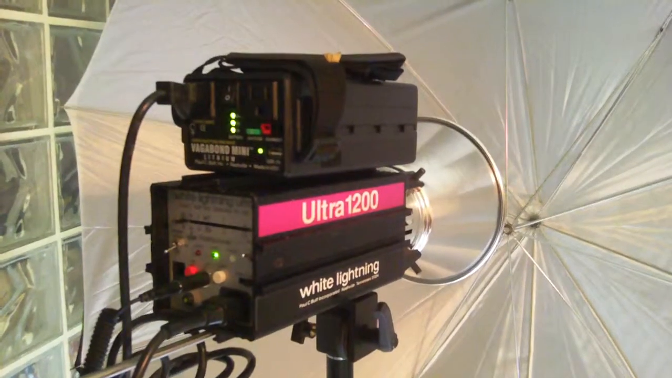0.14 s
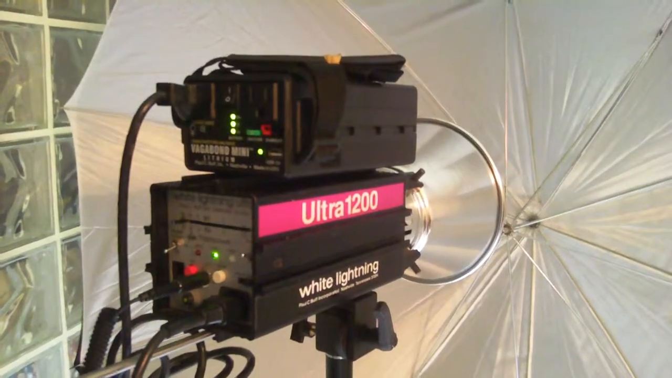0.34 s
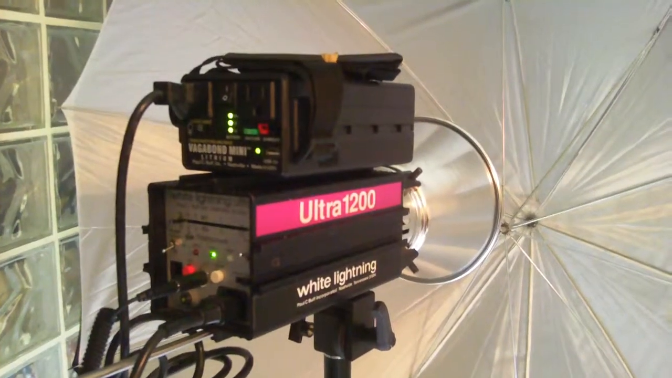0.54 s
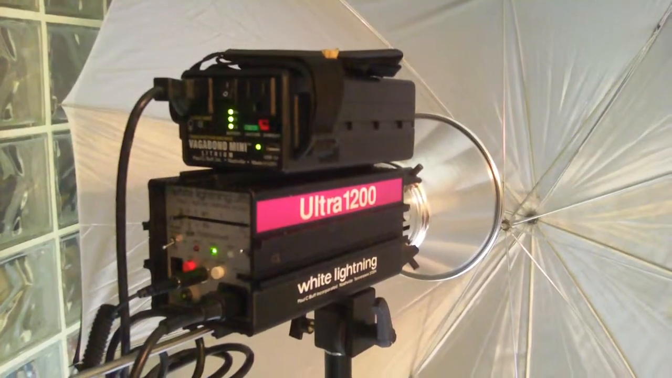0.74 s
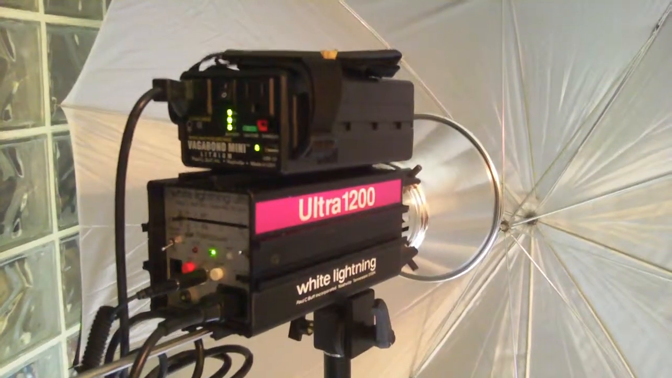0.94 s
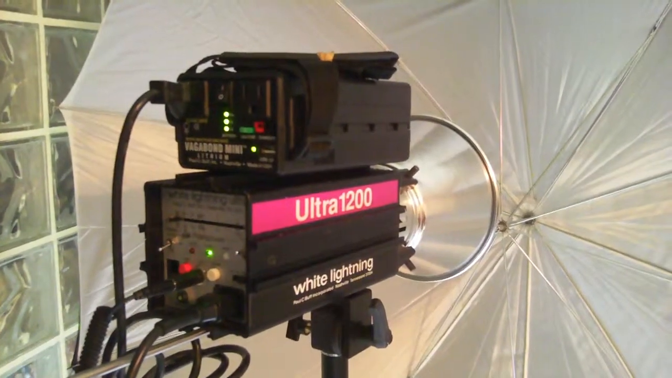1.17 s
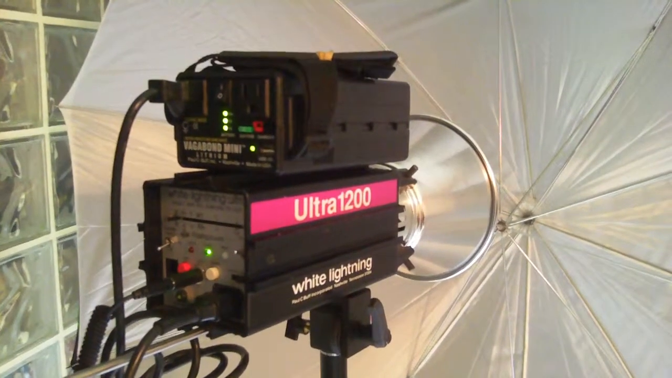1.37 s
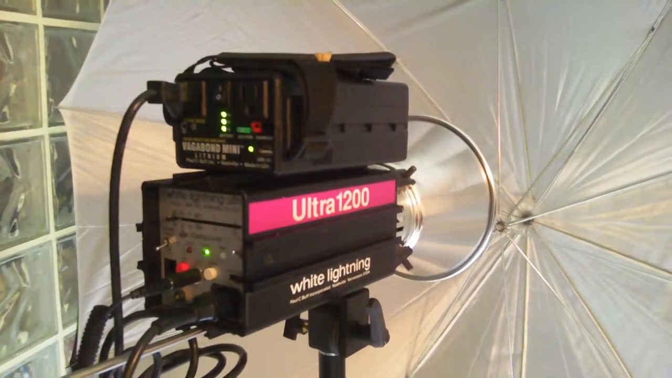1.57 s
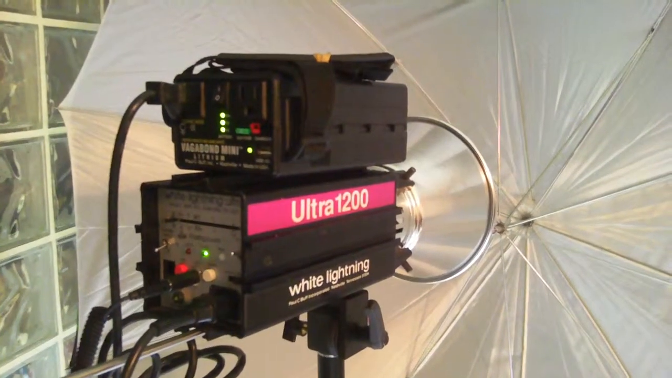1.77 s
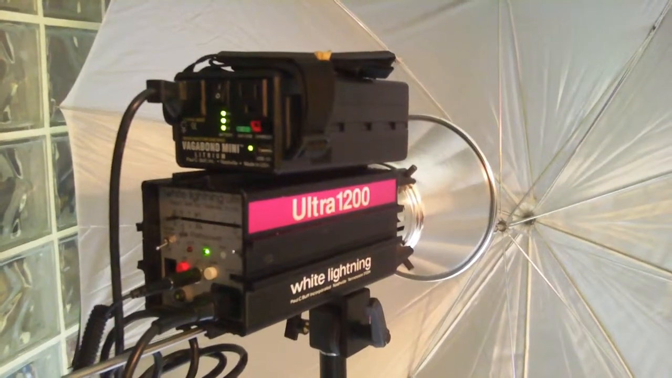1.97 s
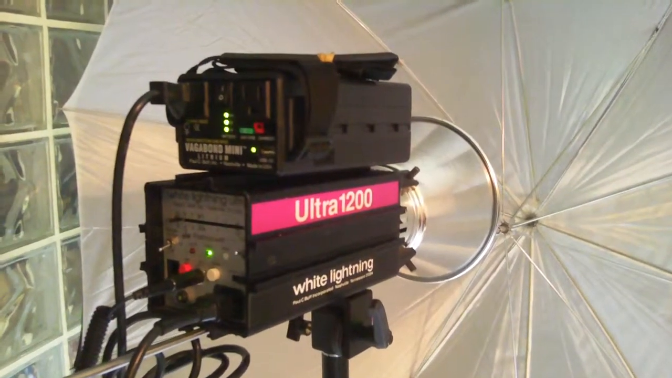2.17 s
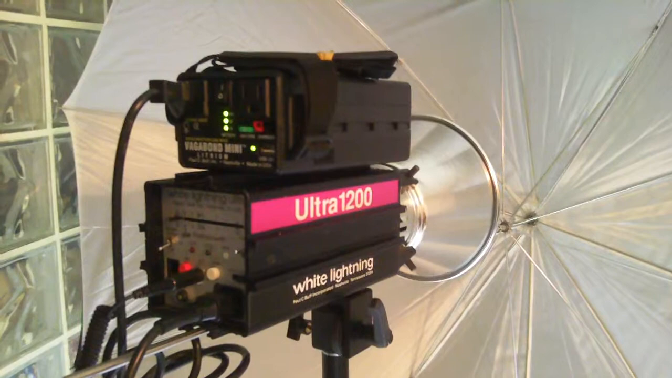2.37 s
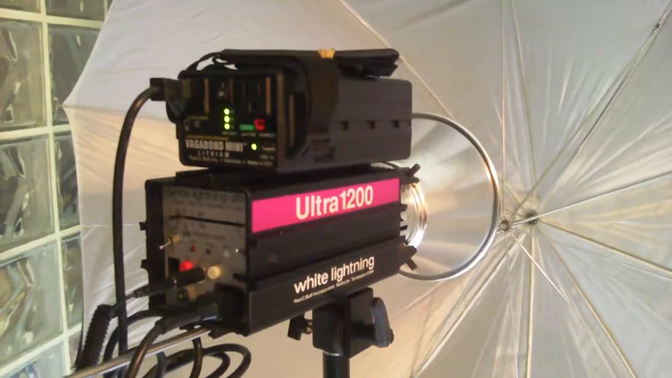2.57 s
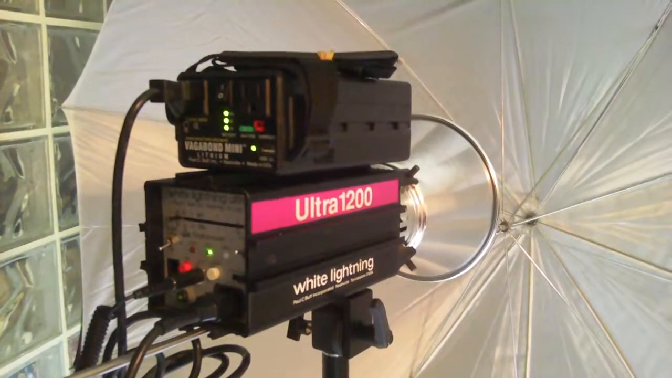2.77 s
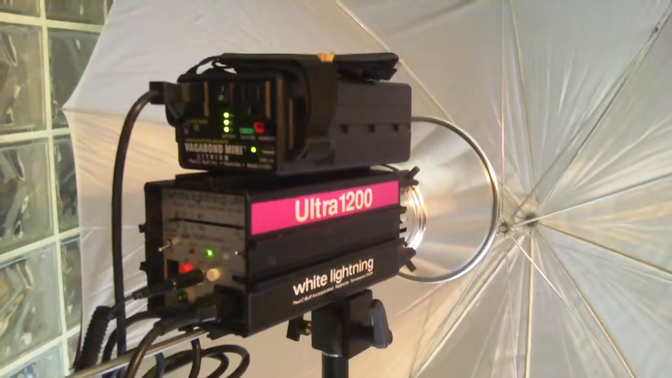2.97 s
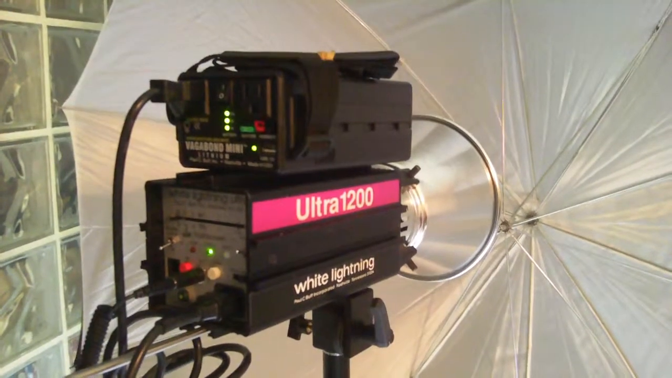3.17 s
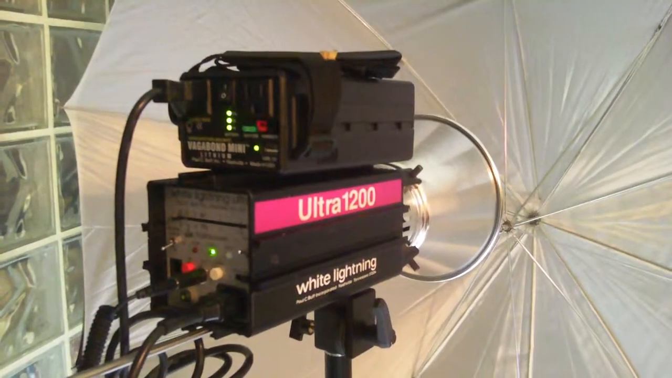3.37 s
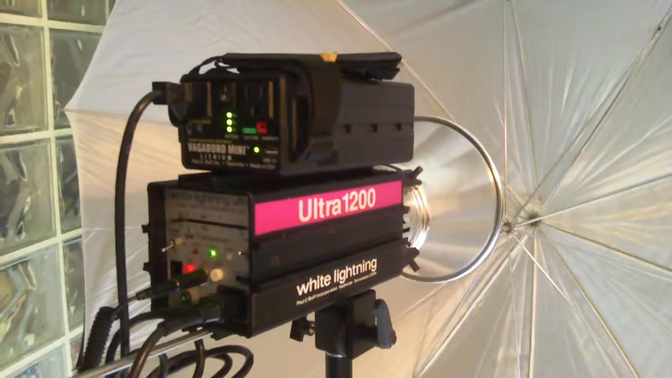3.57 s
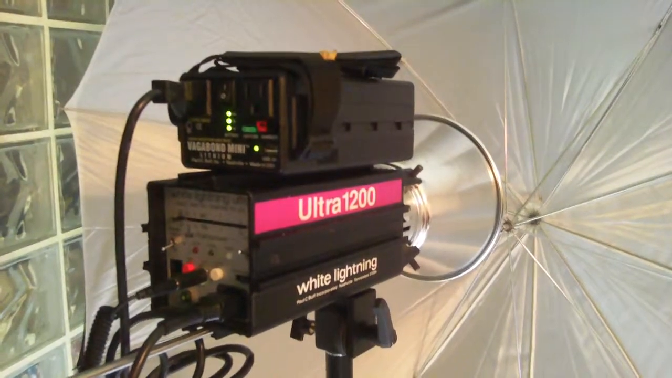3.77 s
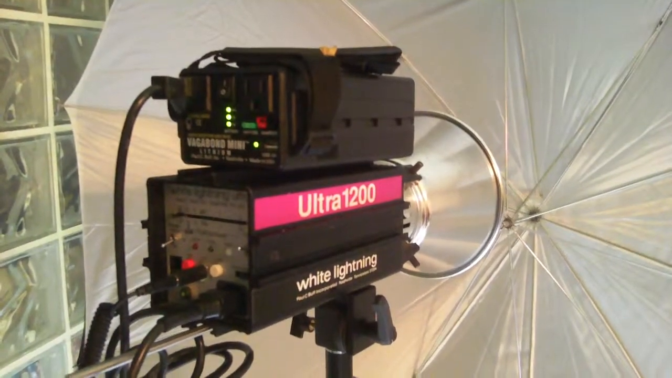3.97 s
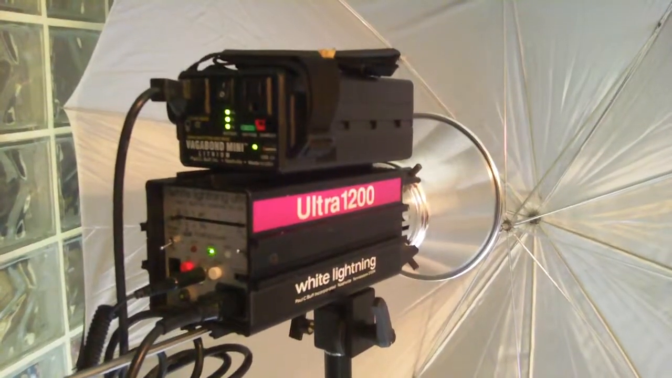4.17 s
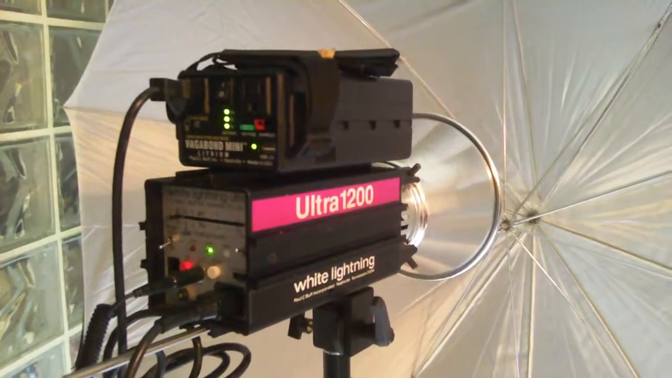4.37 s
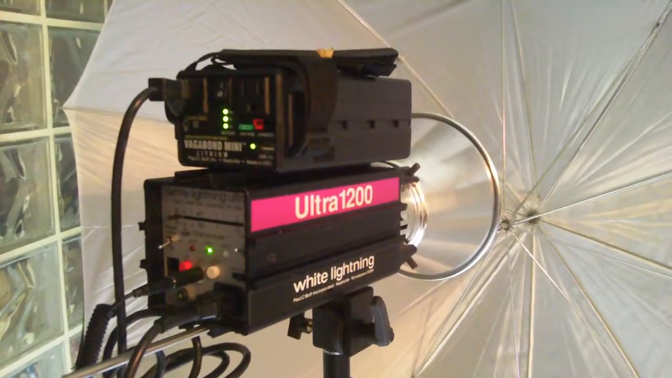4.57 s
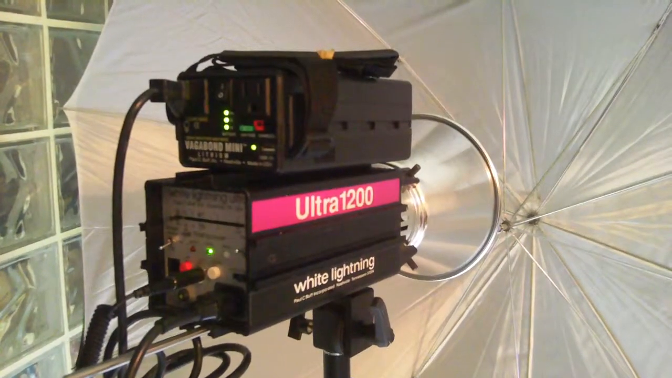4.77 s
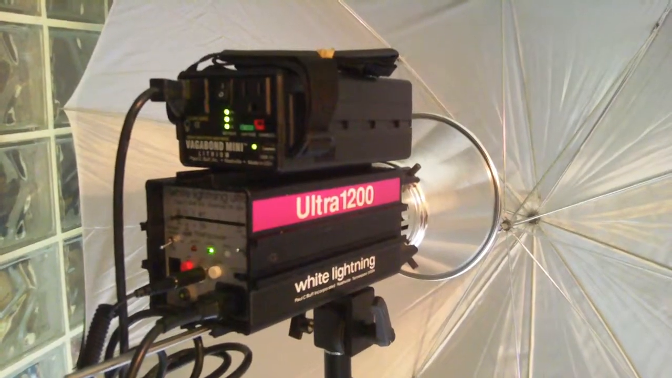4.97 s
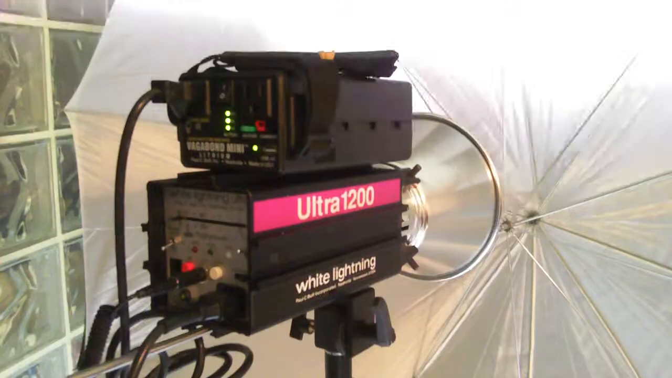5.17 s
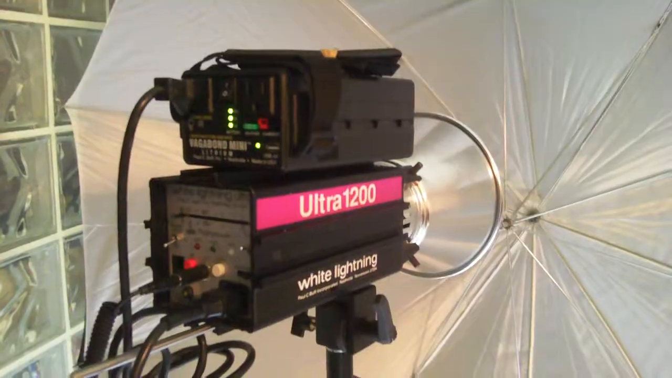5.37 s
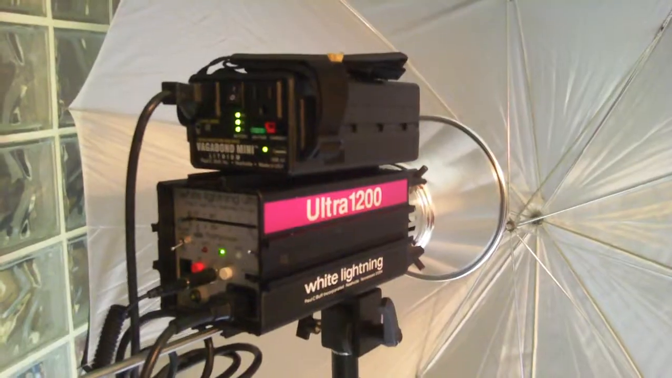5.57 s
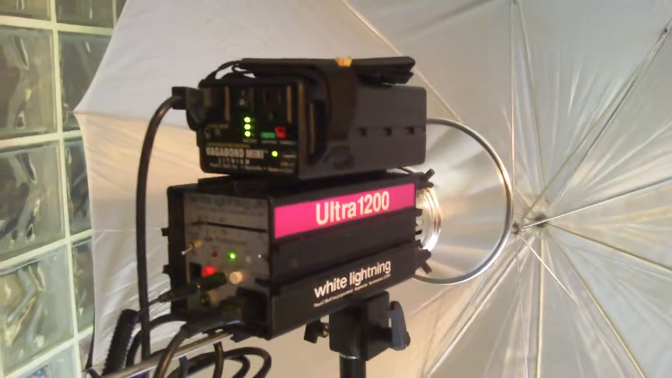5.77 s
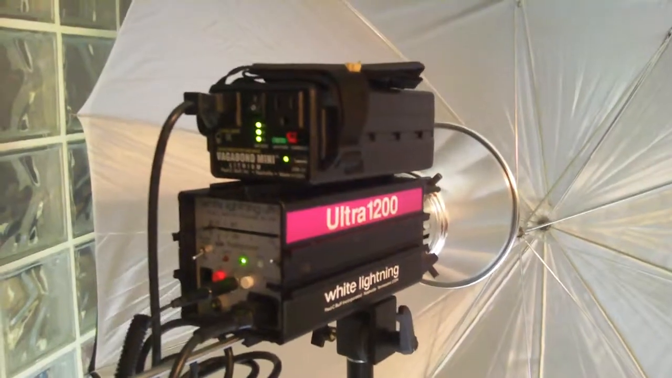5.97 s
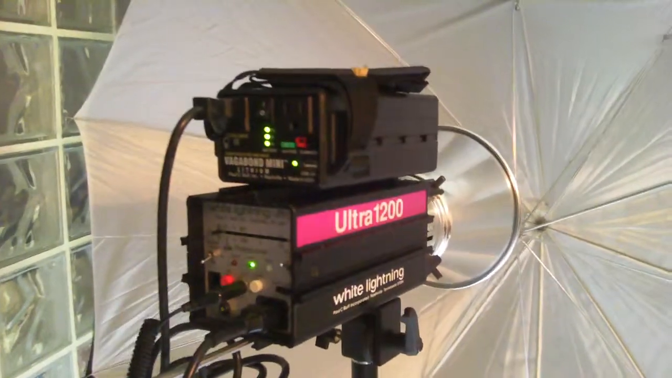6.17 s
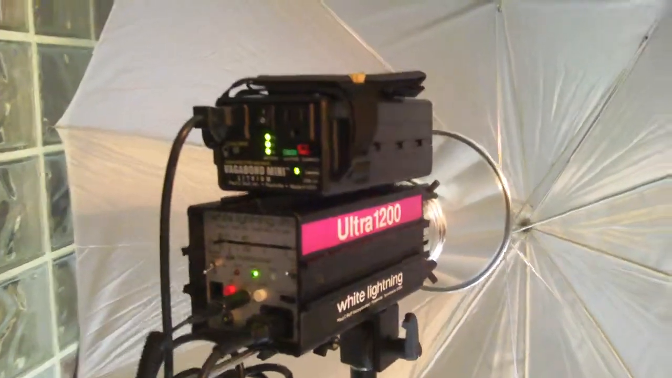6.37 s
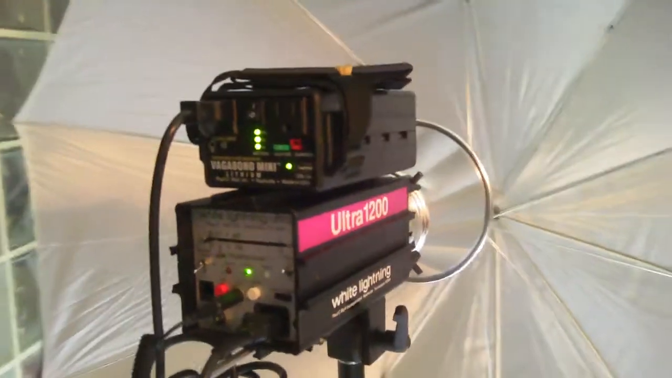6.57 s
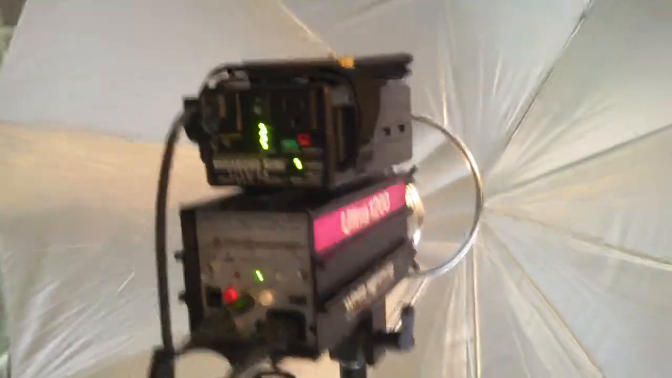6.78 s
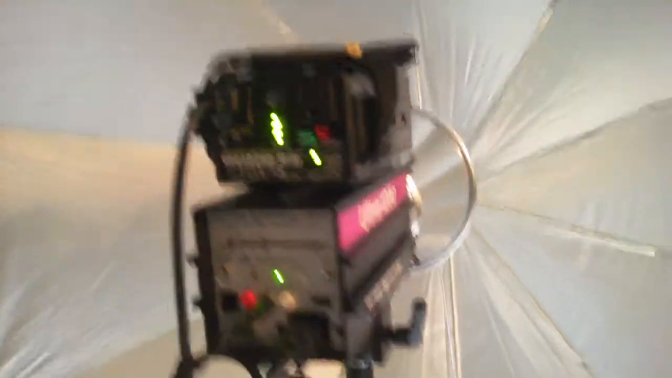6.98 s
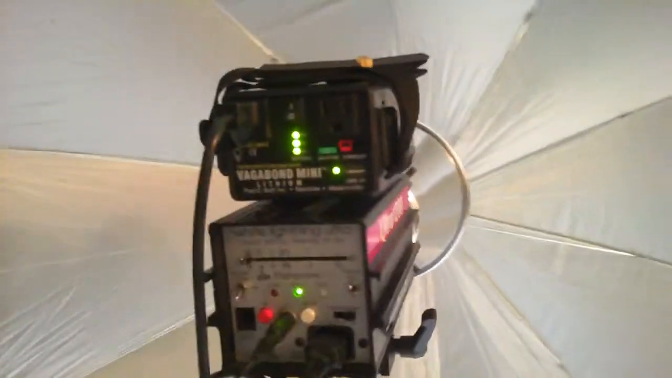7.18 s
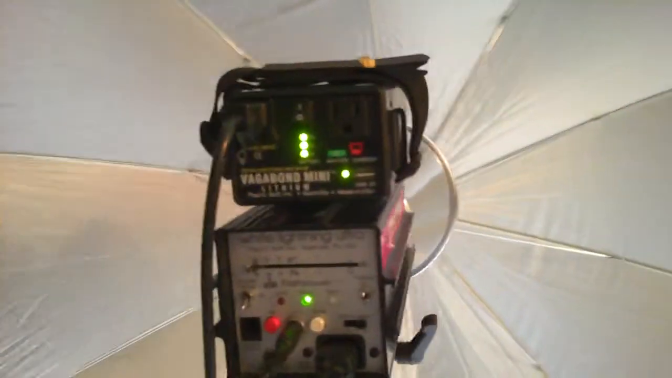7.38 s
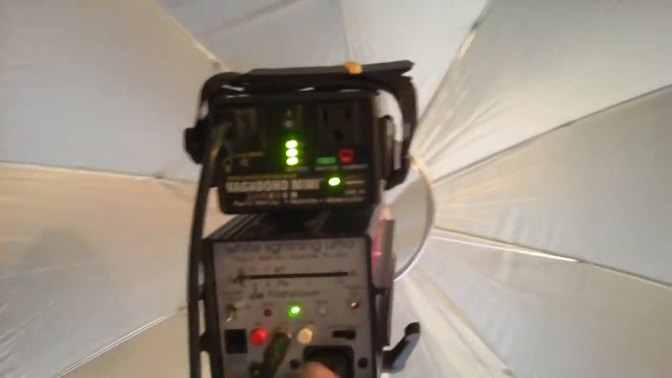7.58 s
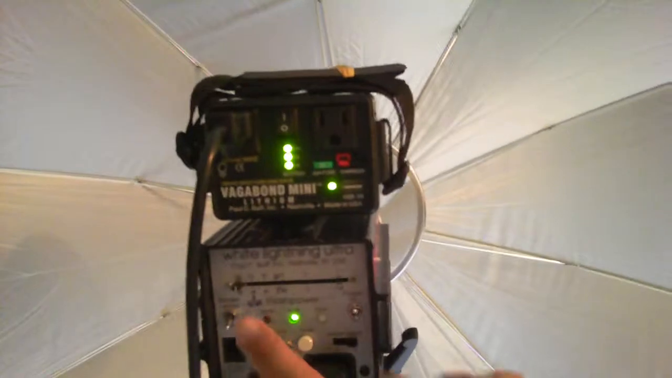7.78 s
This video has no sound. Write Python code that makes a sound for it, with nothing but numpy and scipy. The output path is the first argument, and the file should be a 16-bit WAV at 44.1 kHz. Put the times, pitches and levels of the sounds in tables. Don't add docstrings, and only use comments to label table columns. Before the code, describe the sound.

Three sharp, bright studio flash cracks ring briefly over quiet ventilation hum and hiss, then a button knock and rumbling, rustling handling as the camera moves.

```python
import sys
import numpy as np
from scipy import signal
from scipy.fft import rfft, irfft, next_fast_len
from scipy.io import wavfile
from scipy.ndimage import uniform_filter1d

SR = 44100
rng = np.random.default_rng(int(sys.argv[2]) if len(sys.argv) > 2 else 0)


def field_ratio(decibels):
    return 10 ** (np.asarray(decibels, dtype=float) / 20)


def bounce(signal):
    frames = np.transpose(np.atleast_2d(signal))
    limited = np.clip(frames, -1, 1)
    pcm = np.round(limited * 32767).astype(np.int16)
    wavfile.write(sys.argv[1], SR, pcm)


N = 344923

# (frequency [Hz], level [dB per Hz])
VENTILATION = [(20, -50), (40, -9), (120, -15.5), (200, -3), (500, -5), (1100, -9.5), (1400, -12.5),
               (7000, -25)]
# (frequency [Hz], width [Hz], level [dB])
HUM = [(60.6, 2.7, -88.5), (102.2, 6, -79.5), (118.8, 1.5, -74.5), (204, 6.4, -83), (237.3, 4.9, -79.5),
       (410, 4.5, -78), (465, 3, -77)]
VENTILATION_DB, HISS_DB = -59.5, -60.5

# (time [s], effort [dB])
EFFORT = [
    (6.85, -9),
    (6.99, -2),
    (7.09, -4),
    (7.22, -2),
    (7.36, -1.5),
    (7.55, -2),
    (7.65, 3),
    (7.72, -1.5),
    (7.82, -4),
]
# (start [s], length [s], frequency [Hz], width [Hz], level [dB])
SWISHES = [
    (6.96, .1, 10800, 1500, -67),
    (7.142, 0.14, 11100, 700, -66),
    (7.3, .14, 11000, 600, -68),
    (7.6, 0.13, 10100, 600, -68),
    (7.64, 0.19, 8500, 500, -66),
]
RUMBLE_DB, RUSTLE_DB = -60.5, -64
THRUM_S, THRUM_LENGTH_S, THRUM_DB = 7.02, 0.83, -66

# (time [s], frequency [Hz], peak level [dB])
TICKS = [
    (3.872, 1900, -50),
    (5.4168, 2470, -45.5),
    (5.423, 2600, -50),
    (5.4265, 2500, -52),
    (5.4355, 2450, -52),
    (6.8705, 972, -45.5),
    (6.977, 600, -50),
]
TICK_RISE_S, TICK_T60_S = 0.00012, 0.007
TICK_OVERTONE, TICK_OVERTONE_DB = 2.18, -8
# (frequency [Hz], peak level [dB], 60 dB decay [s])
KNOCK = [(950, -46, .005), (1370, -37, 0.0046), (2080, -39, .004), (3100, -46, .004), (5500, -45.5, .004),
         (7000, -55, .012), (8500, -49, .004), (10500, -42, .002), (12500, -48, .0044)]
KNOCK_S, KNOCK_RISE_S = 6.8002, 0.00016
KNOCK_HITS = [(0, 0), (1.38, -12)]
# (frequency [Hz], width [Hz], level [dB])
SCUFF_TONE = [(6500, 1100, 9), (8600, 1300, 3), (5000, 1200, -7), (10200, 1500, -5)]
# (time [s], level [dB])
SLIPS = [
    (4.5965, -51.5),
    (4.607, -54.5),
    (4.617, -57),
    (4.627, -65),
    (4.642, -64),
    (4.667, -66),
]
SLIP_RISE_S, SLIP_T60_S, SLIP_GRAIN_DB = 0.00097, 0.064, 1

# (time [s], level [dB])
FLASHES = [
    (2.39684, 0),
    (3.75345, -.5),
    (5.24623, .7),
]
# (delay [ms], level [dB], tilt [dB per kHz])
PATHS = [
    (.08, -12, -1),
    (.95, -12, -3.5),
    (2.62, 0, 0),
    (4.42, -5, -3.5),
    (5.5, -16, 0),
    (6.7, -17, 2),
]
TILT_CENTRE_HZ = 11500
# (frequency [Hz], peak level [dB], rise [ms], 60 dB decay [s])
CRACK = [(9750, -22, .9, .0028), (10300, -23, .3, .007), (10870, -13.5, .22, .0025), (11600, -21, .1, .007),
         (13270, -11, 1.3, .003), (14480, -25, .1, .009)]
# (frequency [Hz], peak level [dB], 60 dB decay [s])
BODY = [(980, -50.5, 0.039), (1536, -59, 0.045), (2110, -45, .022), (2990, -40.5, 0.0058),
        (3770, -51, 0.0091), (4290, -41.5, .014), (5160, -52, 0.0064), (5970, -36.5, 0.005),
        (6290, -40, .02), (6900, -37, .007), (7310, -37, .02)]
BODY_RISE_S, BODY_DIRECT_DB = 0.00023, -11
# (frequency [Hz], level [dB], 60 dB decay [s])
RINGS = [(6721, -40.4, 0.068), (7190, -40.7, 0.03), (7413, -55.5, 0.35), (8479, -44.9, 0.06),
         (9212, -34.6, 0.06), (9268, -26.7, 0.063), (10131, -35.9, 0.03), (10275, -39.1, 0.041),
         (10346, -48.6, 0.263), (10409, -32.6, 0.03),
         (10923, -48.7, 0.146), (11172, -45.0, 0.12), (11328, -38.4, 0.033), (11618, -35.9, 0.043),
              (12092, -44.1, 0.078), (12404, -41.1, 0.048), (12875, -40.7, 0.09), (13364, -40.0, 0.158),
              (13385, -30, 0.045), (13540, -36.0, 0.03), (14779, -49.6, 0.069)]
RING_DELAY_S, RING_RISE_S, RING_LONGEST_S = 0.00461, 0.0013, 0.12
# (frequency [Hz], level [dB per Hz])
SNAP_COLOUR = [(500, -30), (900, -25), (2500, -8.5), (3500, -16), (5000, -10.5), (7400, -4), (8500, -30)]
# (start [ms], level [dB], rise [ms], 60 dB decay [s])
SNAPS = [
    (0, -42, .2, .02),
    (2.4, -44, 0.11, 0.043),
]
# (frequency [Hz], level [dB per Hz])
ROOM_COLOUR = [(710, -19), (1200, -15), (2120, -13.5), (4970, -13.5), (8050, -2.5), (13500, 3),
               (15700, -10), (16400, -52)]
# (start [ms], level [dB], rise [ms], 60 dB decay [s])
TAILS = [
    (4, -41.5, 2.7, 0.061),
    (9, -48.5, 7.9, 0.31),
]
# (frequency [Hz], width [Hz], level [dB])
WALL_TONES = [(9265, 90, -9), (13100, 50, -6), (10200, 60, -8.5), (6800, 200, -14), (11900, 80, -17),
              (12900, 80, -19), (2110, 90, -17), (4360, 370, -19), (5640, 160, -23), (3170, 80, -29),
              (1110, 290, -19)]
REPEAT = 0.59

NOTCH_HZ, NOTCH_WIDTH_HZ = 7810, 270
LOW_CUT_HZ, TOP_HZ, STOP_DB = 36, 15345, -38


def unit(x):
    return x / np.sqrt(np.mean(x ** 2))


def coloured(spectrum, size=N):
    hz, db = np.transpose(spectrum)
    bins = np.maximum(np.arange(size // 2 + 1) * SR / size, 1)
    gain = field_ratio(np.interp(np.log(bins), np.log(hz), db))
    return unit(irfft(rfft(rng.standard_normal(size)) * gain, size))


def band(hz, width, size=N):
    b, a = signal.iirpeak(hz, hz / width, fs=SR)
    return unit(signal.lfilter(b, a, rng.standard_normal(size)))


def bands(rows, size=N):
    return sum(field_ratio(db) * band(hz, width, size) for hz, width, db in rows)


def walk(rate):
    hold = int(SR / rate)
    steps = np.repeat(rng.standard_normal(N // hold + 1), hold)
    return unit(uniform_filter1d(steps, hold)[:N])


def arch(start, length):
    return np.sin(np.pi * np.clip((np.arange(N) / SR - start) / length, 0, 1))


def swell(t, rise, t60):
    t = np.maximum(t, 0)
    shape = (1 - np.exp(-t / rise)) ** 2 * 1000. ** (-t / t60)
    return shape / shape.max()


def swells(t, rows):
    return sum(field_ratio(db) * swell(t - ms / 1000, rise / 1000, t60) for ms, db, rise, t60 in rows)


def ring(t, hz, db, rise, t60):
    return field_ratio(db) * swell(t, rise, t60) * np.sin(2 * np.pi * hz * t)


def knocked(t, modes, db, rise):
    return sum((-1) ** k * ring(t, hz, mode_db + db, rise, t60) for k, (hz, mode_db, t60) in enumerate(modes))


def studio():
    ventilation = field_ratio(VENTILATION_DB) * coloured(VENTILATION)
    hiss = field_ratio(HISS_DB) * rng.standard_normal(N)
    return ventilation + hiss + bands(HUM)


def walking():
    times, efforts = np.transpose(EFFORT)
    effort = np.interp(np.arange(N) / SR, times, efforts, left=-120)
    grip = unit(band(460, 380) + field_ratio(-14) * band(1100, 900))
    rumble = grip * field_ratio(RUMBLE_DB + 1.5 * walk(25))
    rustle = band(9200, 6400) * field_ratio(RUSTLE_DB + 1.3 * walk(30))
    whistles = sum(field_ratio(db) * arch(start, length) * band(hz, width)
                   for start, length, hz, width, db in SWISHES)
    thrum = band(101.4, 2.5) * field_ratio(THRUM_DB) * arch(THRUM_S, THRUM_LENGTH_S)
    return (rumble + rustle) * field_ratio(effort) + whistles + thrum


def finger_ticks():
    out, t = np.zeros(N), np.arange(SR // 20) / SR
    for start, hz, db in TICKS:
        at = int(start * SR)
        tick = ring(t, hz, db, TICK_RISE_S, TICK_T60_S)
        tick += ring(t, TICK_OVERTONE * hz, db + TICK_OVERTONE_DB, TICK_RISE_S, TICK_T60_S)
        out[at:at + len(t)] += tick
    return out


def button_knock():
    out, t = np.zeros(N), np.arange(SR // 20) / SR
    at = int(KNOCK_S * SR)
    out[at:at + len(t)] = sum(knocked(t - ms / 1000, KNOCK, db, KNOCK_RISE_S) for ms, db in KNOCK_HITS)
    return out


def fabric_scuff():
    t = np.arange(N) / SR
    slips = sum(field_ratio(db) * swell(t - start, SLIP_RISE_S, SLIP_T60_S) for start, db in SLIPS)
    return unit(bands(SCUFF_TONE)) * slips * field_ratio(SLIP_GRAIN_DB * walk(700))


def tube_crack(t):
    out = np.zeros(len(t))
    for ms, path_db, tilt_db in PATHS:
        for hz, db, rise, t60 in CRACK:
            tilt = tilt_db * (hz - TILT_CENTRE_HZ) / 1000
            level = db + path_db + tilt + 0.5 * rng.standard_normal()
            out += ring(t - ms / 1000, hz, level, rise / 1000, t60)
    return out


def housing_knock(t):
    direct = knocked(t - PATHS[0][0] / 1000, BODY, BODY_DIRECT_DB, BODY_RISE_S)
    umbrella = knocked(t - PATHS[2][0] / 1000, BODY, 0, BODY_RISE_S)
    return direct + umbrella


def dish_and_tube_rings(t):
    return sum(ring(t - RING_DELAY_S, hz, db - 1.2 + 0.8 * rng.standard_normal(),
                    RING_RISE_S, min(t60, RING_LONGEST_S))
               for hz, db, t60 in RINGS)


def snap_and_tail(t):
    walls = coloured(ROOM_COLOUR, len(t)) + bands(WALL_TONES, len(t))
    return swells(t, SNAPS) * coloured(SNAP_COLOUR, len(t)) + swells(t, TAILS) * walls


def flashes():
    out, t = np.zeros(N), np.arange(SR // 2) / SR
    early = t[:SR // 20]
    same_tail = snap_and_tail(t)
    for start, shot_db in FLASHES:
        at = int(start * SR)
        shot = dish_and_tube_rings(t)
        shot += REPEAT * same_tail + np.sqrt(1 - REPEAT ** 2) * snap_and_tail(t)
        shot[:len(early)] += tube_crack(early) + housing_knock(early)
        out[at:at + len(t)] += field_ratio(shot_db) * shot
    return out


def scene():
    hands = finger_ticks() + button_knock() + fabric_scuff()
    mono = studio() + walking() + hands + flashes()
    return np.array([mono, mono])


def band_limit(x):
    return signal.sosfilt(signal.butter(12, 16530, fs=SR, output="sos"), x)


def record(dry):
    b, a = signal.iirnotch(NOTCH_HZ, NOTCH_HZ / NOTCH_WIDTH_HZ, fs=SR)
    x = signal.lfilter(b, a, dry)
    x = signal.sosfilt(signal.butter(4, LOW_CUT_HZ, "high", fs=SR, output="sos"), x)
    size = next_fast_len(N)
    hz = np.arange(size // 2 + 1) * SR / size
    top_cut = np.where(hz < TOP_HZ, 1, field_ratio(STOP_DB))
    x = irfft(rfft(x, size) * top_cut, size)[:, :N]
    return band_limit(x)


dry = scene()
out = record(dry)
bounce(out)
```